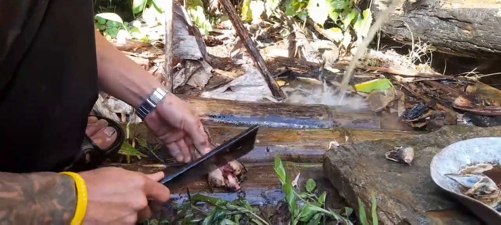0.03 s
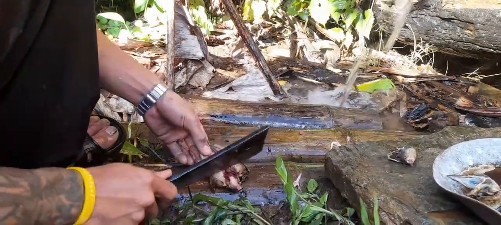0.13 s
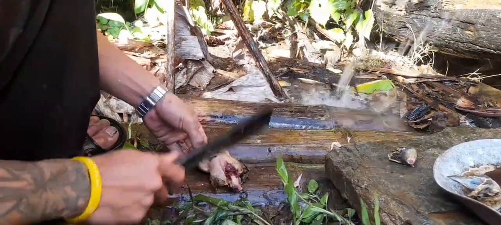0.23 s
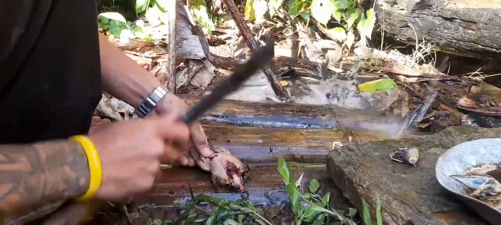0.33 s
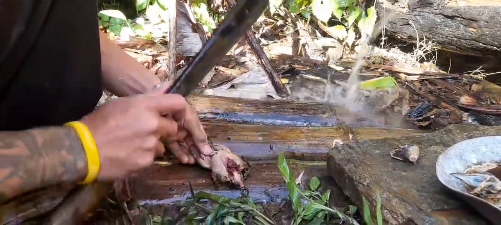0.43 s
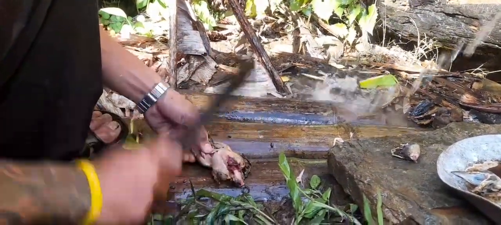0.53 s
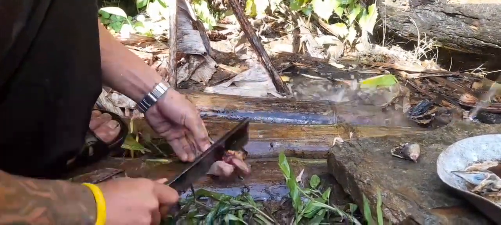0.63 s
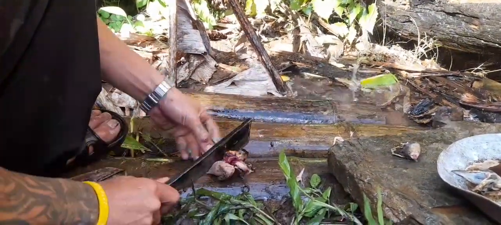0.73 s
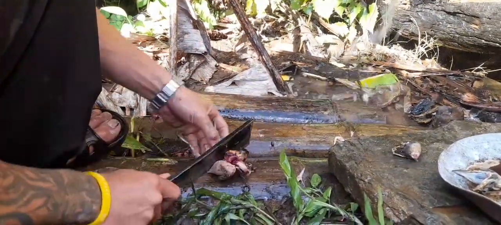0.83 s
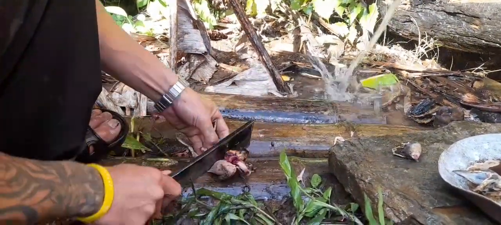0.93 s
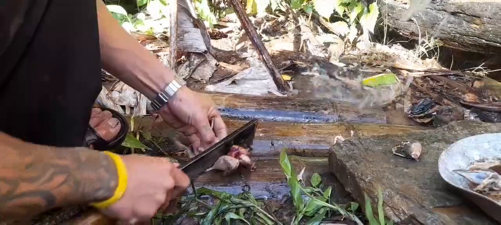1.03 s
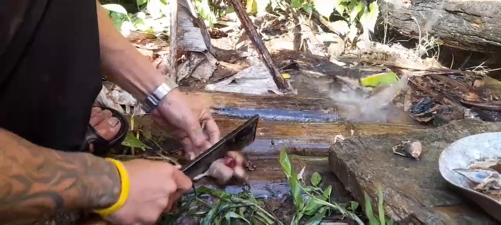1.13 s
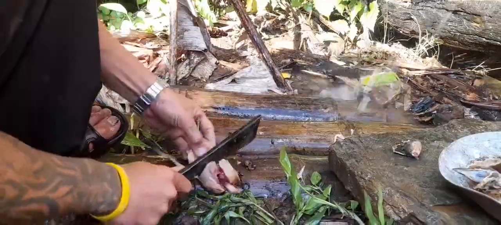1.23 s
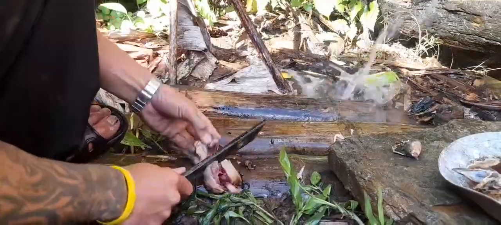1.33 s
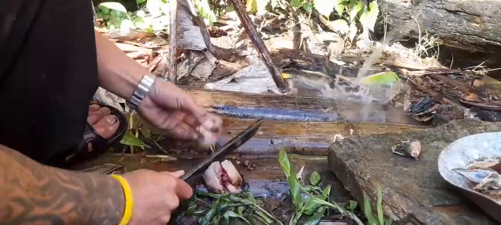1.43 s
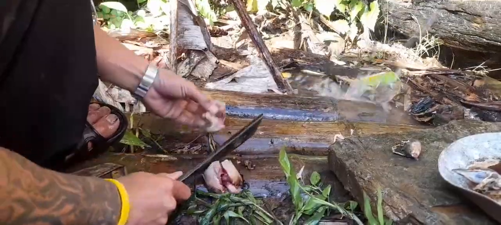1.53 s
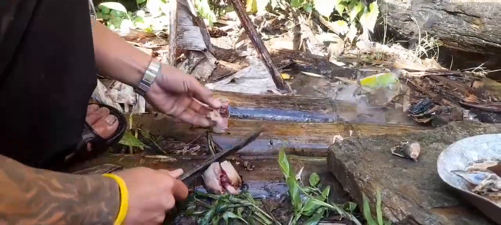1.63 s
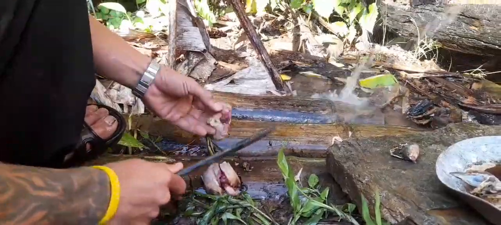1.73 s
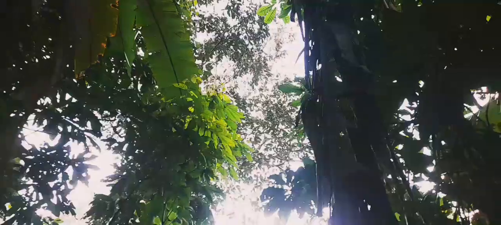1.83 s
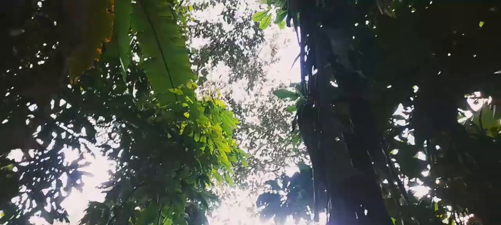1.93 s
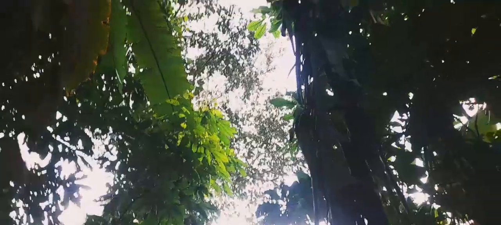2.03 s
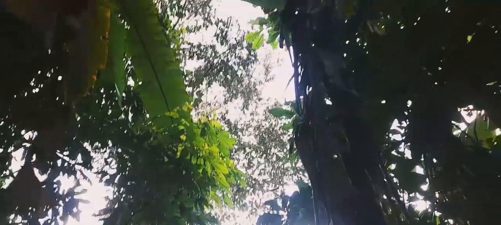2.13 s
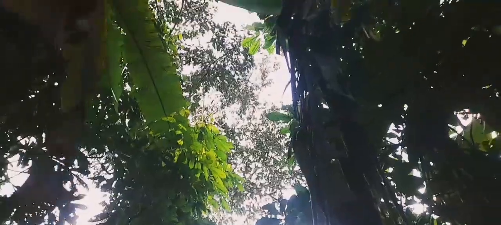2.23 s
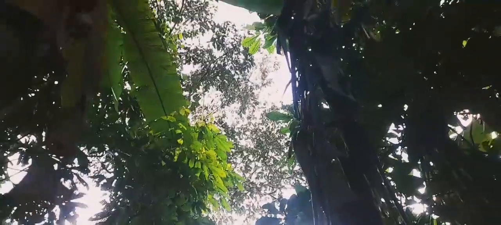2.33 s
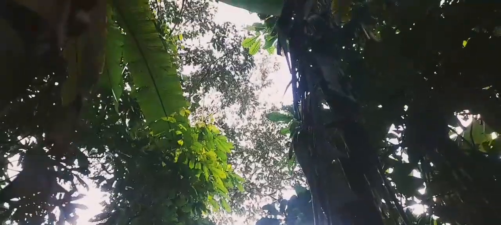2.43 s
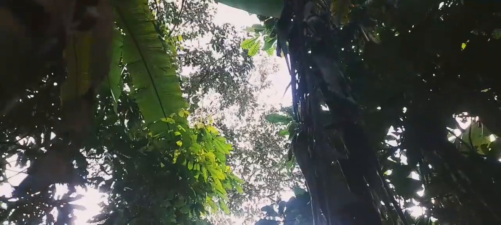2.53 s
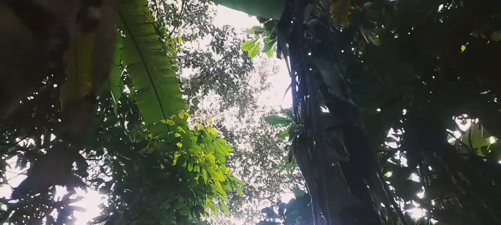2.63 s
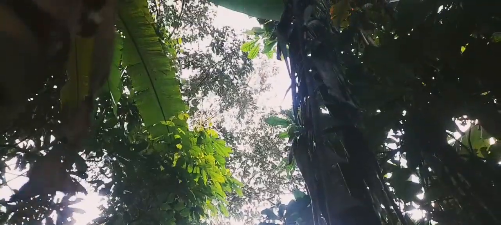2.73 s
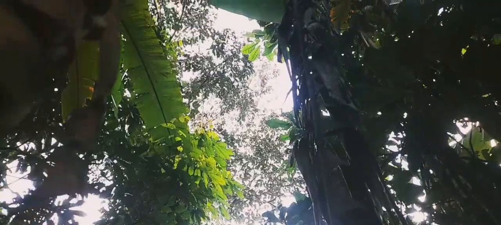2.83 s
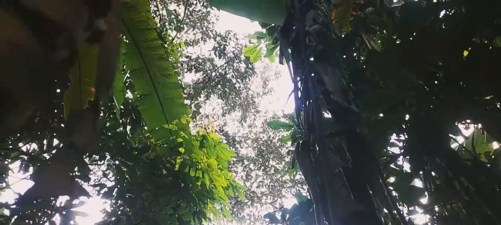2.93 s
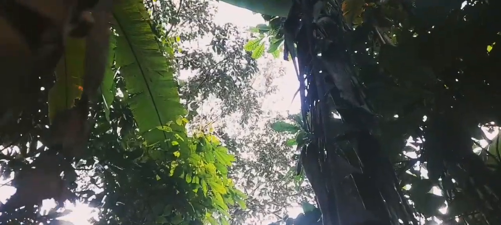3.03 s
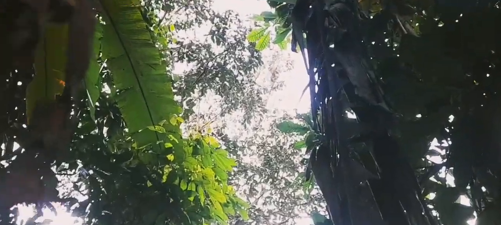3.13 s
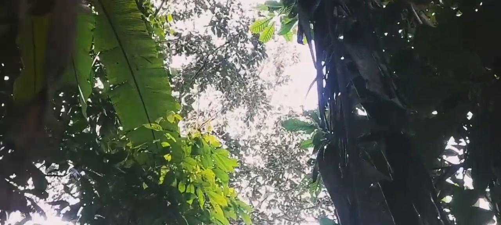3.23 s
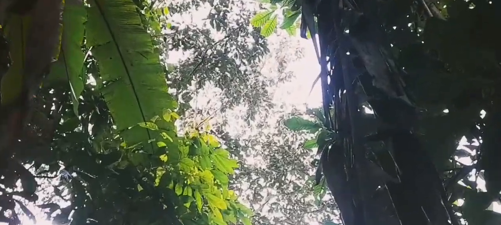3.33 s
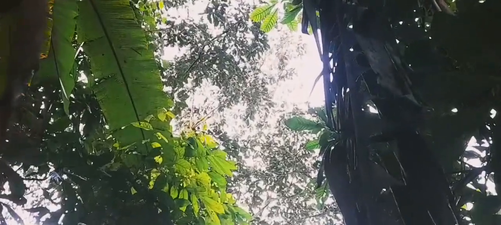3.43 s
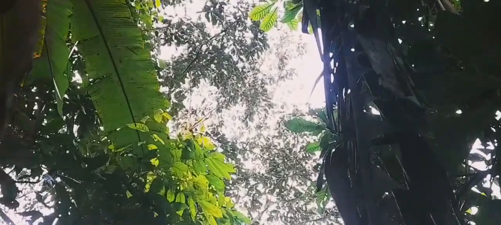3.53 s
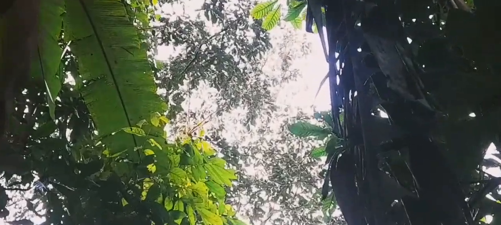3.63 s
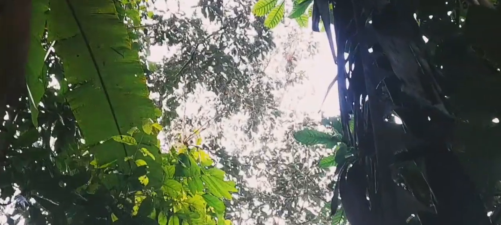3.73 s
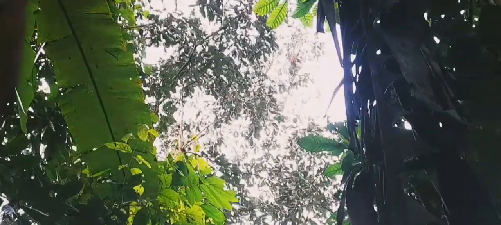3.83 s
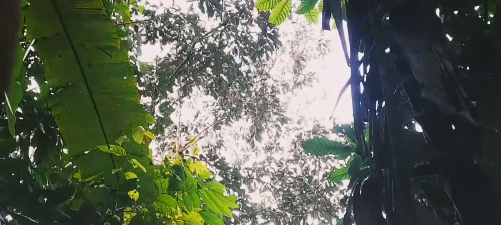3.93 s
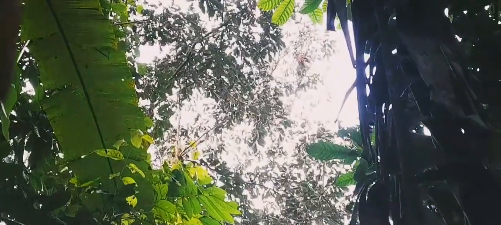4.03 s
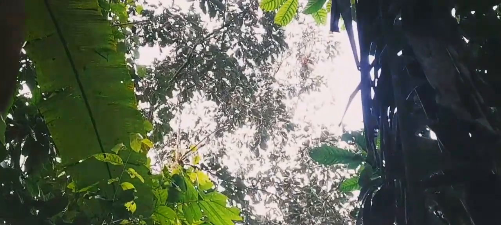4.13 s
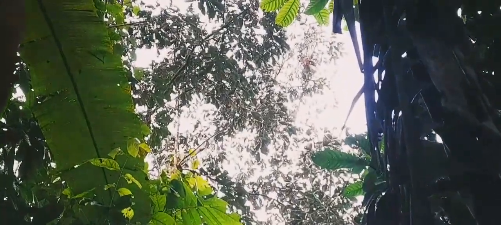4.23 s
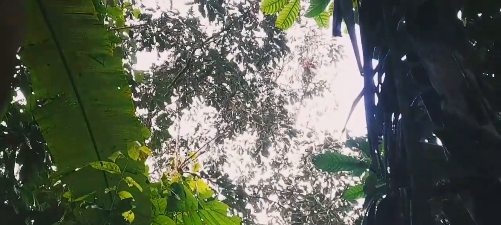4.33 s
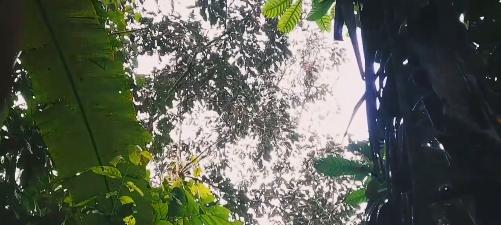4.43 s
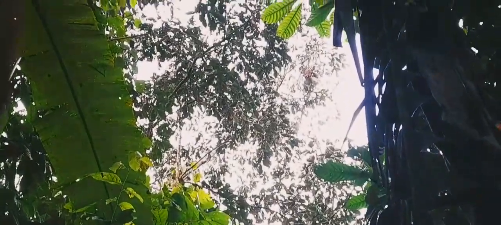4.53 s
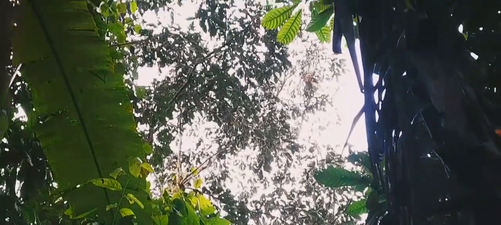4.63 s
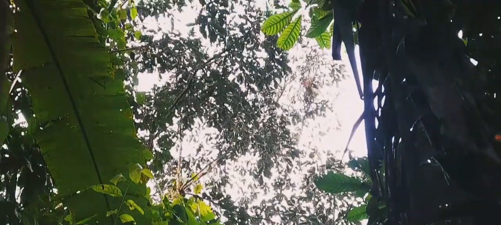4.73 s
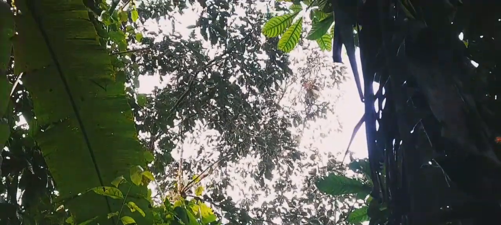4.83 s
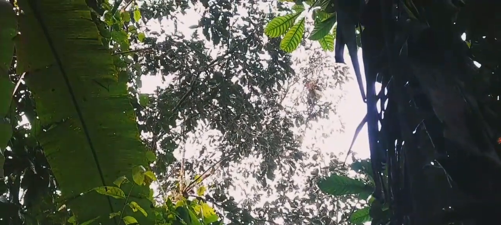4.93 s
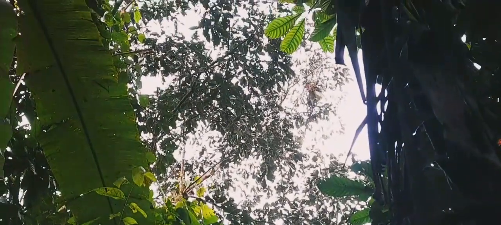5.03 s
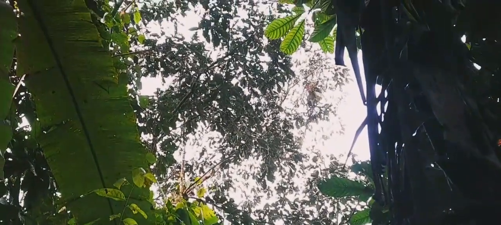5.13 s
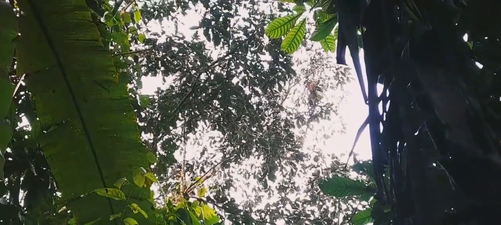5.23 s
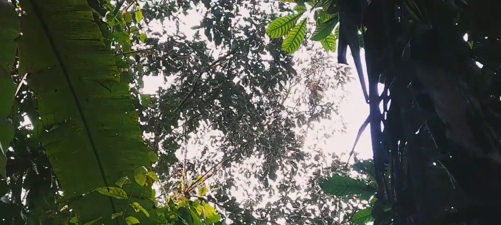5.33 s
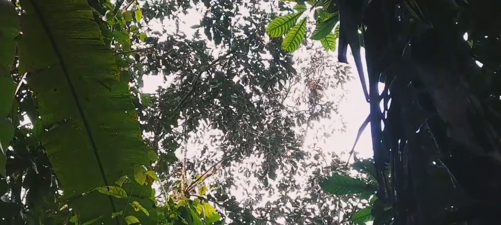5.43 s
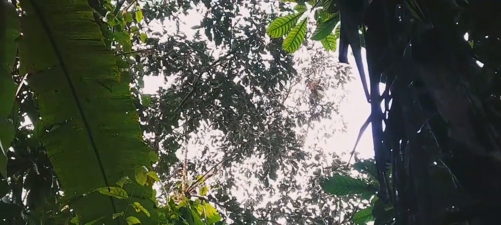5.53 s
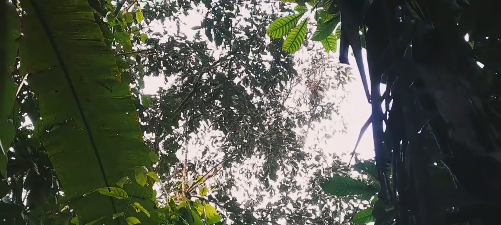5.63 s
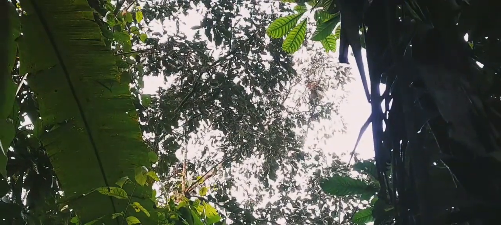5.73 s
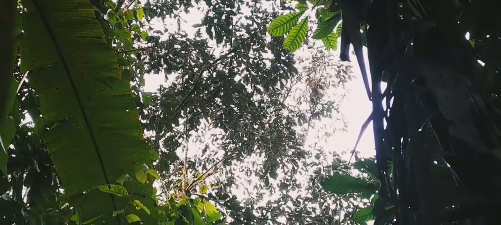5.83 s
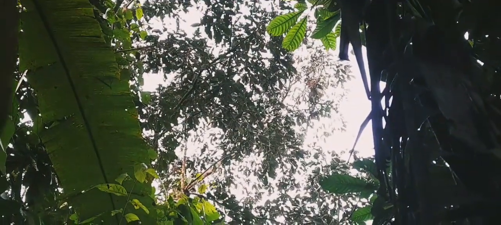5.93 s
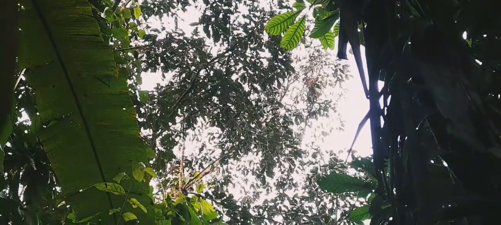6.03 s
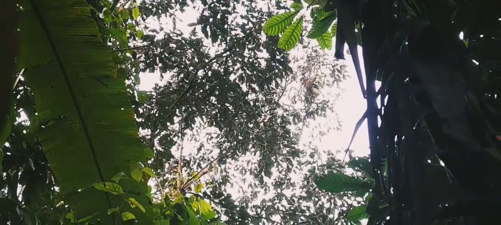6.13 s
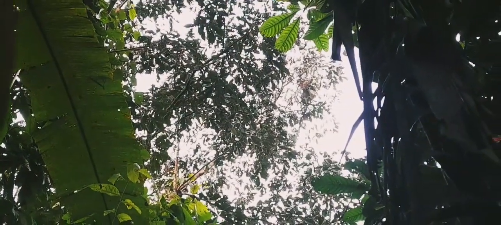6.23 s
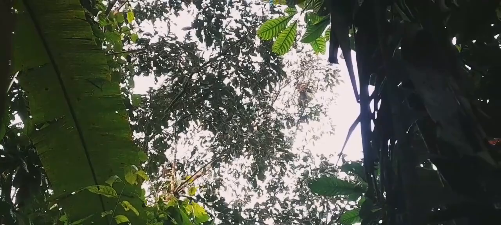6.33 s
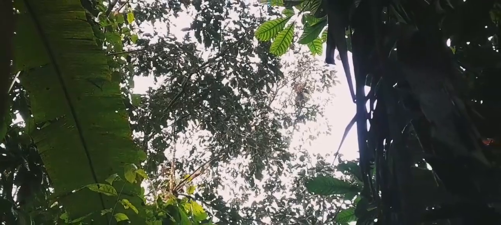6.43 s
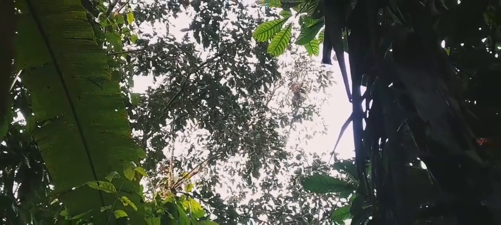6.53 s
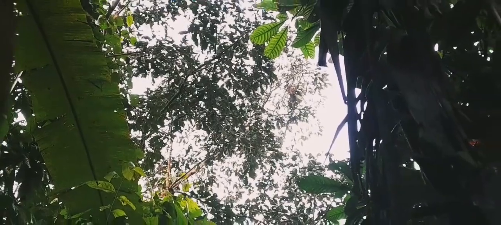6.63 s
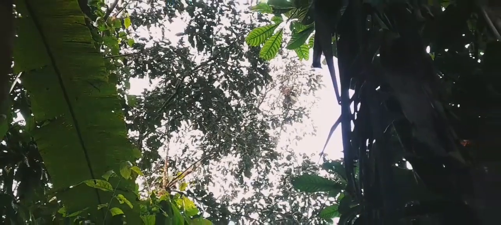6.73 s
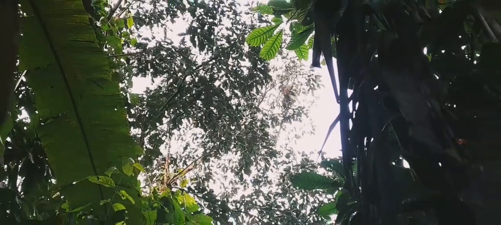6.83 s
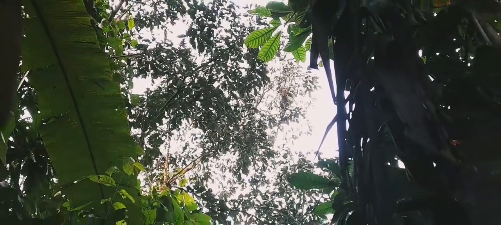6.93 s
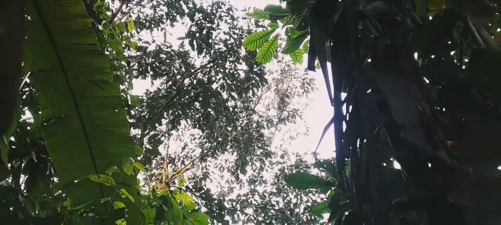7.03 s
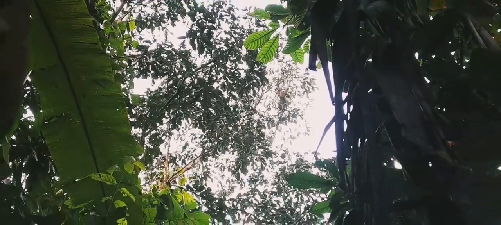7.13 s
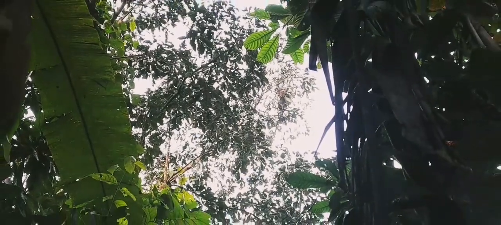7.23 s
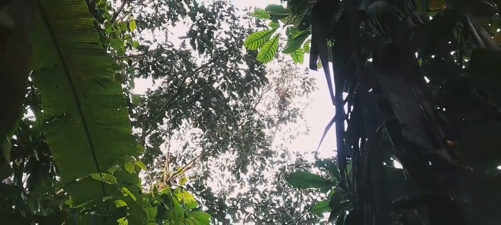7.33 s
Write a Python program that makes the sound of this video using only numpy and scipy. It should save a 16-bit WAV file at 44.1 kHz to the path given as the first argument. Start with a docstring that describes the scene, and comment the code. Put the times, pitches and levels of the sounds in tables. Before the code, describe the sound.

Very close, crisp water spurts in uneven splashes onto a wet log, with bubbles and bright slaps. One sharp woody chop cracks through, followed by tiny taps. After a split-second silence comes a much quieter forest: gliding bird whistles, short nasal honks and one screech, washed in long diffuse echo, with soft knocks and thin rustles over faint air.

```python
"""At a wet log, close to the microphone and to its right: water spurts from a spout onto the wood
while a large knife chops once. Water is clumped noise with bubble tones; the log is a set of ringing modes.
After a brief silence, a quiet forest: birds whistle, honk and screech as gliding tones and harmonics, and
one thin, steady insect tone sounds near 5.8 kHz; the trunks return all of these as a long diffuse echo.
Twigs and drops knock softly, thin rustles swell; the same forest air, steady noise, lies faintly under the water."""
import sys
import numpy as np
from scipy import signal
from scipy.io import wavfile
from scipy.ndimage import uniform_filter1d

SR = 44100
rng = np.random.default_rng(int(sys.argv[2]) if len(sys.argv) > 2 else 0)


def to_wav(sig):
    """Store sig (one row per channel, or 1-D mono) as 16-bit WAV at the path in sys.argv[1].

    Samples outside -1..1 are clipped; the rate is SR.
    """
    pcm = np.clip(np.atleast_2d(sig), -1, 1) * 32767
    pcm = np.round(pcm).astype(np.int16)
    wavfile.write(sys.argv[1], SR, pcm.T)  # frames by channels


N = 325017
T = np.arange(N) / SR   # time of every sample, s

# spurts from the spout: top_s, rise_s, hold_s, spray_db, gurgle_re_spray_db
SPURTS = [(0.0, .003, 0.018, -34, 3), (0.036, 0.026, 0.071, -40, 10.5), (0.137, 0.092, 0.0058, -33, -0.5),
          (0.174, 0.054, 0.046, -38.5, 4.5), (0.254, 0.043, 0.01, -31, -1),
          (0.334, 0.079, 0.0045, -33, 1.5), (0.366, 0.024, 0.011, -38.5, 12),
          (0.398, 0.0047, 0.01, -39, -11), (0.462, 0.026, 0.012, -39, -2), (0.507, 0.0032, 0.061, -36, -10),
          (0.573, 0.016, 0.072, -38.5, 4), (0.667, 0.014, 0.023, -48.5, 11.5),
          (0.74, 0.022, 0.093, -56, -31), (0.94, 0.0017, 0.01, -46.5, -3), (0.972, 0.024, 0.11, -40, -10),
          (1.041, 0.0094, 0.12, -44.5, 9), (1.096, 0.014, 0.033, -40, 1), (1.192, 0.0022, 0.012, -40, -3),
          (1.241, 0.032, 0.016, -46, -1), (1.315, 0.0019, 0.056, -42.5, -3),
          (1.425, 0.0014, 0.083, -42.5, -13), (1.466, 0.038, 0.035, -39.5, -1.5),
          (1.535, 0.0072, 0.046, -39.5, -1.5), (1.63, 0.005, 0.011, -34.5, -6),
          (1.746, 0.16, 0.0024, -41, 2)]
# slugs of water slapping the wood: start_s, treble_peak_db, body_re_treble_db
SLAPS = [(0.136, -14, -2), (0.2546, -9.5, -3.5), (0.3163, -16, -22.5), (0.339, -15, -22.5),
         (0.3717, -12, -13), (0.5081, -12, -15.5), (0.5385, -17, -9), (0.613, -15, -13.5),
         (0.637, -13.5, -7.5), (0.7414, -25, -32), (0.941, -20.5, -10.5), (0.98, -19.5, -32),
         (1.1958, -15.5, -21), (1.3117, -14, -15), (1.347, -15.5, -19), (1.5232, -30, -22),
         (1.6295, -15.5, -9)]
# tone balance of the water: pitch_hz, relative_density_db (per Hz)
WATER_SPECTRUM = [(35, -59), (60, -30.5), (140, -10), (497, -3.5), (961, -10), (1270, -0.5), (1900, -5),
                  (2090, -9.5), (4120, 0), (5870, -9), (10300, -2), (15000, -6), (16500, -32)]
# stereo width of the water: pitch_hz, left_right_likeness (0-1)
WATER_ALIKE = [(60, 0.67), (240, 0.89), (950, 0.74), (3770, 0.17), (15000, 0.4)]
# balance of the water: pitch_hz, left_over_right_db
WATER_PAN = [(60, -5), (500, 0.5), (3770, -1.5), (15000, -5.0)]
# single bubbles: start_s, start_hz, end_over_start_pitch (factor), length_s, level_db
BUBBLES = [(0.154, 1300, 1.2, 0.0073, -33.5), (.431, 850, 0.93, .012, -40), (0.922, 296, 1.8, 0.0214, -64),
           (0.82, 398, 2.1, 0.02, -60), (0.955, 3360, 1.07, 0.0058, -35.5), (0.968, 1300, 6, 0.017, -42.5),
           (1.189, 612, 3, 0.015, -50), (1.229, 349, 2.6, 0.031, -55), (1.322, 1300, 1.3, 0.0066, -40),
           (1.541, 1400, 1.16, 0.0095, -39), (1.643, 1350, 1.5, 0.0057, -32),
           (1.728, 1400, 1, 0.0076, -40.5)]
# ringing modes of the log: pitch_hz, relative_level_db, t60_s
LOG_MODES = [(166, -13, 0.045), (240, -14, 0.04), (300, -17.5, 0.036), (373.5, -16, 0.038),
             (464, -17.5, .05), (554, -14.5, 0.05), (680, -14, 0.041), (785, -11.5, 0.029),
             (1618, -14.5, .025), (3840, -4, .015), (4450, 2, .008), (5477, -1.5, 0.018)]
# blows on the log: start_s, relative_level_db, contact_hz
BLOWS = [(0.647, 5, 680), (0.678, -14.5, 583), (1.62, -22, 198), (1.658, -23.5, 200), (1.688, -23.5, 196)]
# whistled bird notes and one steady insect tone (5790 Hz):
# start_s, length_s, start_hz, middle_hz, end_hz, level_db, start_to_end_swell_db
WHISTLES = [ (1.815, 0.044, 3160, 3060, 3060, -60, -23), (1.848, 0.068, 2464, 2306, 2080, -63.5, 0),
            (1.938, 0.029, 3000, 3000, 2870, -62, 0), (1.981, 0.035, 2754, 2790, 2760, -63, -4),
            (2.415, 0.023, 2426, 2623, 2520, -49.5, 4), (2.616, 0.066, 2960, 3170, 3190, -47.5, 17),
            (2.651, 0.05, 3285, 3280, 3238, -43.5, -9), (2.702, 0.032, 3190, 2600, 2170, -45, -9),
            (2.85, 0.029, 4230, 4190, 3050, -50, 26), (2.901, 0.066, 2535, 3190, 3550, -41, 10.5),
            (2.965, 0.074, 3540, 4460, 4650, -46, -18), (4.622, 0.062, 4590, 4380, 4010, -59.5, 1),
            (4.681, 0.13, 2950, 3135, 3070, -59.5, -4), (4.77, 0.071, 2506, 2680, 2760, -57, -7),
            (4.85, 0.066, 2290, 2416, 2516, -59, 0), (4.915, 0.1, 3750, 4080, 3950, -66.5, 4),
            (4.914, 0.028, 3115, 3090, 3330, -55.5, 9), (4.979, 0.023, 3120, 2940, 2730, -50, -3),
            (5.021, 0.013, 2540, 2515, 2500, -51.5, -20), (5.037, 0.048, 3530, 3890, 4170, -58.5, -9),
            (5.235, 0.12, 2361, 2312, 2410, -50.5, 5), (5.253, 0.057, 2710, 2776, 3010, -44.5, -2),
            (5.328, 0.042, 2983, 2750, 2205, -44, 3), (5.375, 0.025, 3010, 2924, 2970, -47, -6),
            (5.486, 0.038, 4070, 3930, 3220, -45, 13), (5.5, 0.055, 2307, 2820, 2900, -44, 3),
            (5.53, 0.058, 2410, 3060, 3137, -39, 8), (5.605, 0.047, 3216, 3900, 4430, -37, 3.5),
            (5.57, 0.037, 2380, 2260, 1650, -52, 4), (5.685, 0.057, 2606, 2385, 2226, -49.5, -11.5),
            (6.079, 0.057, 1803, 1914, 2020, -55.5, -9), (6.129, 0.071, 3167, 3015, 3010, -53, -8),
            (6.235, 0.089, 2516, 2337, 2270, -51, -9), (6.221, 0.023, 2713, 2730, 2560, -48.5, -7),
            (6.334, .03, 2250, 2224, 2000, -51, 14), (6.282, 0.021, 1860, 1725, 1560, -54, -19),
            (6.348, 0.048, 4150, 3384, 2830, -50.5, 9), (6.372, 0.051, 2264, 3310, 4450, -50.5, -16),
            (6.64, 0.23, 5790, 5810, 5740, -74.5, -3), (6.695, 0.045, 2720, 2000, 1856, -60.5, -12),
            (6.769, 0.053, 3154, 3034, 2754, -47.5, 7), (6.962, 0.02, 2020, 2330, 2560, -58, -18),
            (7, 0.023, 3200, 2990, 2410, -46.5, 5), (7.064, 0.06, 3850, 3170, 3275, -48, -4),
            (7.083, 0.053, 1570, 1920, 2180, -62.5, 0), (7.26, 0.042, 2026, 2370, 2634, -56, 17),
            (7.302, 0.013, 2460, 4770, 5250, -40, 4), (7.31, 0.029, 5140, 3930, 3640, -32.5, 18),
            (7.328, 0.033, 3630, 3350, 3180, -34.5, -8)]
# nasal honks: start_s, end_s, start_hz, held_hz, brightest_hz, bright_width_hz, level_db, hoarse_start (0-1)
HONKS = [(2.339, 2.414, 476.4, 505, 2990, 927, -59.5, 0.37),
         (2.807, 2.902, 371, 477, 1860, 701, -67.5, 0.1), (3.148, 3.26, 382, 463, 2240, 652, -62, 0.12),
         (3.497, 3.593, 391, 483, 2350, 800, -62, 0.12), (3.873, 3.982, 383.7, 468, 2350, 700, -63, .1),
         (4.107, 4.171, 392, 464, 2270, 400, -66, .1), (4.19, 4.245, 500.4, 528, 2660, 676, -45, 0.24),
         (6.006, 6.085, 474.3, 532.5, 2744, 664, -45, 0.31),
         (6.882, 6.986, 488, 537.5, 3160, 1320, -55, 0.7)]
# course of one screech: time_s, pitch_hz, tone_db, rasp_db, pitch_jitter (share)
SCREECH = [(4.269, 1333, -63, -73, 0.043), (4.289, 1450, -56.5, -67.5, 0.089),
           (4.315, 1433, -53, -59, 0.072), (4.332, 1505, -45, -61, 0.011),
           (4.349, 1538, -55.5, -56, 0.0035), (4.402, 1532, -72, -88, 0.0034),
           (4.45, 1494, -79, -94, 0.0035)]
# harmonics of the screech: multiple_of_pitch (count), relative_level_db
SCREECH_HARMONICS = [(2, -2), (3, -13), (4, 2.5), (5, -7), (6, -16)]
# soft knocks of twigs and drops: start_s, level_db, pitch_hz
KNOCKS = [(1.91, -42, 728), (2.028, -54, 795), (3.273, -51, 1110), (3.576, -49, 900), (3.837, -50, 762),
          (4.95, -46, 750), (5.086, -50.5, 810), (5.172, -48.5, 1310), (7.033, -44, 630)]
# thin high rustles: start_s, end_s, low_hz, high_hz, level_db
RUSTLES = [(1.812, 2.016, 3460, 16500, -64), (2.694, 3.126, 2270, 6830, -65),
           (5.504, 5.75, 1800, 9800, -63), (6.079, 6.49, 11150, 13800, -67.5),
           (6.255, 6.41, 6000, 7700, -66), (7.289, 7.384, 4490, 12700, -51),
           (6.897, 7.025, 4300, 15000, -73)]
# tone balance of the forest air: pitch_hz, relative_density_db (per Hz)
FOREST_SPECTRUM = [(15, -46), (25, -12.5), (138, -7.5), (220, -7.5), (399, -13.5), (766, -3.5), (1510, -7),
                   (2530, -7), (3150, -2.5), (5720, -13.5), (9580, -19), (10700, -24.5), (14000, -23.5),
                   (16500, -42.5)]
# stereo width of the forest air: pitch_hz, left_right_likeness (below 0 is treated as 0)
FOREST_ALIKE = [(60, 0.48), (240, 0.82), (950, -0.82), (3770, -0.04), (15000, -0.068)]
# balance of the forest air: pitch_hz, left_over_right_db
FOREST_PAN = [(60, -2.5), (950, -3), (15000, -14)]
# course of the far birds: time_s, relative_level_db
CHATTER = [(1.8, -60), (2.3, -89), (2.8, -48), (3.4, -67), (4.0, -63.5), (4.5, -68.5), (5.0, -59),
           (5.5, -67), (6.0, -53), (6.4, -52.5), (6.6, -73), (7.0, -66), (7.37, -52.5)]
# deep bumps, the ground under the blow and the forest opening: start_s, level_db, pitch_hz, decay_s
THUMPS = [(0.653, -37.5, 52.53, .04), (1.819, -51.5, 59, 0.027)]
# silence between the two places: start_s, end_s
SILENCE_S = (1.772, 1.819)

RISE_DB = 18                              # climb of a spurt during its rise
SAG_DB_PER_S, FALL_DB_PER_S = 49.5, 381   # loss from the top on, further loss after the hold
TRICKLE_DB, TRICKLE_GURGLE_DB = -68, -6   # drips between spurts: spray, gurgle re spray
CROWD_DB = -12.5                          # small bubbles re gurgle
SPITS_PER_S, SPIT_DB = 220, 5.5           # lone drops: typical rate, level re spray
SLAP_SNAP_S, SLAP_SPLASH_S = .001, .005   # decay times
GROUND_ECHO_S = .012                      # delay before the surroundings answer the blow
NOTE_EDGE_S, NOTE_ARCH_DB = .004, -2      # whistles: fade time, middle of a note re its ends
NEAR_DB = -42                             # whistles quieter than this are farther away
DIRECT_LOSS = .3                          # dB of direct sound lost per dB of farness
GLIDE_WARBLE = .0025                      # pitch share per dB of farness, times the width of the glide
HONK_WAVER, HONK_RASP_S = .005, .052      # pitch share, time scale of a hoarse start
FOREST_DB = -62                           # rms of the forest air
LOW_CUT_HZ, CUTOFF_HZ = 42, 16500         # microphone bass cut, top cut


def from_db(db):
    """Amplitude gain of a level in dB."""
    return 10 ** (np.asarray(db) / 20)


def rms_one(x):
    """Scale to an rms of 1."""
    return x / np.sqrt(np.mean(x ** 2) + 1e-20)


def in_time(rows):
    """Draw straight lines through the columns of a table whose first column is time."""
    s, *columns = np.transpose(rows)
    return [np.interp(T, s, column) for column in columns]


def at_hz(points, hz):
    """Read a frequency table along a logarithmic axis."""
    known_hz, values = np.transpose(points)
    return np.interp(np.log(hz), np.log(known_hz + 1), values)


def fade(t, start, end, edge):
    """1 between start and end, with ramps of edge seconds."""
    return np.clip(np.minimum(t - start, end - t) / edge, 0, 1)


def panned(x, pan_db):
    """Set left over right by pan_db, half on each channel."""
    return x * from_db(np.array([[.5], [-.5]]) * pan_db)


def drift(rate, size):
    """Smooth noise of spread 1, from two equal low-pass poles at rate Hz."""
    r = np.exp(-2 * np.pi * rate / SR)
    noise = signal.lfilter([1], [1, -2 * r, r * r], rng.standard_normal(size + 9000))
    return rms_one(noise[9000:])   # the filter has settled


def band(x, low_hz, high_hz):
    """Keep one frequency band."""
    return signal.sosfilt(signal.butter(2, [low_hz, min(high_hz, .45 * SR)], "band", fs=SR, output="sos"), x)


def banded(white, spectrum, alike, pan, patchy_db, rate, count=2, colour=None):
    """Stereo noise bands, count to the octave, each with its own level, flicker, likeness and balance."""
    out, size = 0, white.shape[-1]
    edges = 25 * 2 ** np.arange(0, 9.6, 1 / count)
    for k, (low, high) in enumerate(zip(edges, edges[1:])):
        mid, side = band(white[k % 2], low, high)
        hz = np.sqrt(low * high)
        likeness = np.clip(at_hz(alike, hz), 0, 1)
        level_db = at_hz(spectrum, hz) + patchy_db * drift(rate, size) + (colour(hz) if colour else 0)
        stereo = np.sqrt(1 + likeness) * mid + np.sqrt(1 - likeness) * side * [[1], [-1]]
        out = out + from_db(level_db) * panned(stereo, at_hz(pan, hz))
    return out


def flow(size):
    """Each spurt rises, holds and falls; spurts add in power. Returns spray dB and gurgle re spray dB."""
    top, rise, hold, db, gurgle_db = np.transpose(SPURTS)[:, :, None]
    t = T[:size] - top
    level = db - RISE_DB * np.clip(-t, 0, 9) / rise
    level = level - SAG_DB_PER_S * np.clip(t, 0, 9) - FALL_DB_PER_S * np.clip(t - hold, 0, 9)
    # doubled dB make powers
    spray = np.sum(from_db(2 * level), axis=0) + from_db(2 * TRICKLE_DB)
    gurgle = np.sum(from_db(2 * (level + gurgle_db)), axis=0) + from_db(2 * (TRICKLE_DB + TRICKLE_GURGLE_DB))
    return 10 * np.log10(spray), 10 * np.log10(gurgle / spray)


def gurgles(level_db):
    """A crowd of small bubbles born at random, each a short rising tone."""
    out = np.zeros(len(level_db) + 2000)
    for at, pitch, cycles, size in rng.random((260, 4)):
        hz = 450 * 5.5 ** pitch
        u = np.linspace(0, 1, int((4 + 10.0 * cycles) * SR / hz))
        i = int(at * len(level_db))
        tone = np.sin(2 * np.pi * np.cumsum(hz * 1.4 ** u) / SR) * np.sin(np.pi * u ** 0.27)
        out[i:i + len(u)] += from_db(level_db[i] + 10 * size) * tone
    return out[:len(level_db)]


def spits(level_db):
    """Lone drops burst at random, each ringing briefly in one of twelve bands, at its own place."""
    size = len(level_db)
    born = rng.random(size) < SPITS_PER_S * from_db(5 * drift(12, size)) / SR
    strength_db = level_db + 5 * np.minimum(rng.exponential(1, size), 2)
    place_db = rng.normal(0, 4, (2, size))
    clicks = born * from_db(strength_db) * from_db(place_db)
    dealt = rng.integers(0, 12, size)   # which band each drop rings
    return sum(band(clicks * (dealt == k) + 1e-18, hz / 1.5, hz * 1.1) * np.sqrt(SR / hz)
               for k, hz in enumerate(np.geomspace(1300, 12000, 12)))


def water():
    """Dense droplet grains in clumps; spray and gurgle swell with each spurt."""
    size = int(1.8 * SR)
    spray, gurgle = flow(size)
    grains = from_db(3.44 * np.minimum(rng.exponential(1, size), 4) + 2.08 * drift(140, size))
    white = rng.standard_normal((2, 2, size)) * grains

    def colour(hz):
        """The lower the band, the more it follows the gurgle."""
        return spray + np.clip(np.log2(7000 / hz) / 3.6, 0, 1) * gurgle

    wet = from_db(1.5) * banded(white, WATER_SPECTRUM, WATER_ALIKE, WATER_PAN,
                                patchy_db=3.6, rate=22, count=3, colour=colour)
    wet += panned(gurgles(spray + gurgle + CROWD_DB), -2.5)
    wet += panned(spits(spray + SPIT_DB), -2.5)
    return np.pad(wet, ((0, 0), (0, N - size)))


def forest_air():
    """The quiet bed of the forest: steady noise in bands that flicker slowly."""
    white = rng.standard_normal((2, 2, N))
    air = banded(white, FOREST_SPECTRUM, FOREST_ALIKE, FOREST_PAN, patchy_db=2.3, rate=3.1)
    return from_db(FOREST_DB) * rms_one(air)


def slaps():
    """Each slug of water is a short bright burst of noise with a duller body."""
    out, t = np.zeros((2, N)), np.arange(900) / SR
    envelope = np.exp(-t / SLAP_SNAP_S) + 0.45 * np.exp(-t / SLAP_SPLASH_S)
    for (s, db, body_db), white in zip(SLAPS, rng.standard_normal((len(SLAPS), 2, 900))):
        burst = (white + 0.25 * white[::-1]) * envelope   # the channels share a little
        treble = band(burst, 7000, 14000)
        body = from_db(body_db) * band(burst, 700, 7200)
        shot = (treble + body) / np.abs(treble).max()
        i = round(s * SR)
        out[:, i:i + 900] += panned(from_db(db) * shot, -2.5)
    return out


def bubbles():
    """A bubble is a brief sine, mostly rising in pitch as it nears the surface."""
    out = np.zeros(N)
    for s, hz, rise, length, db in BUBBLES:
        u = np.arange(round(length * SR)) / (length * SR)
        tone = np.sin(2 * np.pi * np.cumsum(hz * rise ** u) / SR) * np.sin(np.pi * np.sqrt(u))
        i = round(s * SR)
        out[i:i + len(u)] += 2 * from_db(db) * tone
    return out


def log():
    """Every blow rings the modes of the log; the wood first yields, then springs back."""
    push = np.full(2 * SR + 9000, 1e-18)
    for s, db, contact_hz in BLOWS:
        k = np.arange(900) * 2 * np.pi * contact_hz / SR
        i = round(s * SR)
        push[i:i + 900] += from_db(db) * k * (k - 1.4) * np.exp(-k) * k[1]
    out = 0
    for hz, db, t60 in LOG_MODES:
        r, w = from_db(-60 / (t60 * SR)), 2 * np.pi * hz / SR
        out = out + signal.lfilter([0, from_db(db) * np.sin(w)], [1, -2 * r * np.cos(w), r * r], push)
    # a log radiates little deep bass
    out = signal.sosfilt(signal.butter(4, 120, "high", fs=SR, output="sos"), out)
    return np.pad(out, (0, N - len(push)))


def crack():
    """The blade edge bites: a few milliseconds of bright noise."""
    t = np.clip(T - BLOWS[0][0] + .0024, 0, 1)
    burst = rng.standard_normal(N) * (t / .002) * np.exp(-t / .002)
    return from_db(1.5) * band(burst, 2800, 6000)


def thump():
    """Deep bumps: a dying low sine each."""
    out = 0
    for s, db, hz, decay in THUMPS:
        t = np.clip(T - s, 0, 1)
        out = out + from_db(db) * np.sin(2 * np.pi * hz * t) * np.exp(-t / decay)
    return out


def scattered_echo(x, t60_s):
    """Scattering, as off trunks: a dying noise response, its own in each ear, building up over a few ms."""
    t = np.arange(int(1.5 * SR)) / SR
    envelope = (from_db(-60 * t / t60_s) + 5.7 * np.exp(-t / 0.057)) * (1 - np.exp(-t / .006))
    tail = rng.standard_normal((2, len(t))) * envelope
    tail /= np.sqrt(np.sum(tail ** 2, axis=1, keepdims=True))
    return signal.fftconvolve(x[None], tail, axes=1)[:, :N]


def rustles():
    """Swells of flickering noise, each in its own high band."""
    out = np.zeros((2, N))
    for start, end, low_hz, high_hz, db in RUSTLES:
        here = slice(round(start * SR), min(round(end * SR), N))
        t = T[here]
        noise = band(rng.standard_normal((2, N // 10)), low_hz, high_hz) * from_db(2.9 * drift(45, N // 10))
        swell = np.sin(np.pi * np.abs((t - start) / (end - start)) ** 0.74)
        out[:, here] += from_db(db) * swell * rms_one(noise)[:, :len(t)]
    return out


def whistles():
    """Near sines with a faint octave: gliding bird notes, one insect tone. Rows: as sung, direct part."""
    out, warble = np.zeros((2, N)), drift(170, N)
    for s, length, start_hz, middle_hz, end_hz, db, swell_db in WHISTLES:
        here = slice(round(s * SR), min(round((s + length) * SR), N))
        u = (T[here] - s) / length
        far_db = np.clip(NEAR_DB - db, 0, 15)
        hz = uniform_filter1d(np.interp(u, [0, .5, 1], [start_hz, middle_hz, end_hz]), size=150)
        warble_share = 0.0014 + GLIDE_WARBLE * far_db * abs(np.log(end_hz / start_hz))
        phase = 2 * np.pi * np.cumsum(hz * (1 + warble_share * warble[here])) / SR
        level = from_db(db + swell_db * (u - .5) + NOTE_ARCH_DB * np.sin(np.pi * u))
        level = level * fade(T[here], s, s + length, NOTE_EDGE_S)
        note = level * (np.sin(phase) + from_db(-42) * np.sin(2 * phase))
        out[:, here] += note * from_db([[0], [-DIRECT_LOSS * far_db]])
    return out


def chatter():
    """Many far birds: short random glides, meant to be heard only as echo."""
    out, u = np.zeros(N + 4000), np.linspace(0, 1, 3000)
    opens = SILENCE_S[1] * SR
    for at, pitch, glide, size in rng.random((300, 4)):
        i = int(opens + at * (N - opens))
        hz = 2000 * 1.8 ** pitch * 1.4 ** ((glide - .5) * u)
        tone = np.sin(2 * np.pi * np.cumsum(hz) / SR) * np.sin(np.pi * u)
        out[i:i + 3000] += from_db(2.5 * size) * tone
    return from_db(in_time(CHATTER)[0] - 11.0) * out[:N]


def knocks():
    """Dull taps of twigs and drops: a quickly dying puff of noise around a pitch."""
    out, t = np.zeros(N), np.arange(1500) / SR
    for (s, db, hz), white in zip(KNOCKS, rng.standard_normal((len(KNOCKS), 1500))):
        i = round(s * SR)
        out[i:i + 1500] += from_db(db) * band(white * np.exp(-t / 0.014), hz / 2.1, hz * 1.52)
    return out


def honks():
    """Harmonics sliding up to a held pitch, shaped by one broad throat resonance."""
    out, waver, hoarse = np.zeros(N), 1 + HONK_WAVER * drift(40, N), drift(470, N)
    for start, end, start_hz, held_hz, bright_hz, width_hz, db, rough in HONKS:
        here = slice(round(start * SR), round(end * SR))
        t = T[here]
        hz = held_hz + (start_hz - held_hz) * np.exp(-(t - start) / .023)
        phase = 2 * np.pi * np.cumsum(hz * waver[here]) / SR
        stack = sum(np.sin(k * phase) / (1 + ((k * held_hz - bright_hz) / width_hz) ** 2) ** 2
                    for k in range(2, 11))
        rasp = rough * np.exp(-((t - start) / HONK_RASP_S) ** 2)
        stack *= 1 - .8 * rasp + (.05 + rasp) * hoarse[here]
        out[here] += from_db(db) * fade(t, start, end, 0.023) * stack
    return out


def screech():
    """Jittery harmonics plus a broad rasp."""
    hz, tone_db, rasp_db, jitter = in_time(SCREECH)
    phase = 2 * np.pi * np.cumsum(hz * (1 + jitter * drift(282, N))) / SR
    tone = sum(from_db(db) * np.sin(int(k) * phase) for k, db in SCREECH_HARMONICS)
    rasp = rms_one(band(rng.standard_normal(N), 2800, 12000))
    sound = from_db(tone_db) * tone + from_db(rasp_db) * rasp
    return fade(T, SCREECH[0][0], SCREECH[-1][0], 0.0025) * sound


def animal_calls():
    """Bird calls and the insect tone, direct sound to the right, with their long echo and the far birds'."""
    flutter = from_db(.8 * drift(60, N))   # slight random flutter in the level of every call
    voices, direct = (whistles() + honks() + screech()) * flutter
    late = np.roll(direct, 10)   # louder on the right, but arriving there a little later
    near = panned(from_db(-1.0) * np.array([direct, late]), -16.0)
    return near + panned(from_db(5.0) * scattered_echo(voices + chatter(), t60_s=0.87), -6.0)


def wet_log():
    """Close sound of water and chopped wood, with a faint answer from the surroundings."""
    wood = log() + crack()
    answer = scattered_echo(np.roll(wood, round(GROUND_ECHO_S * SR)), t60_s=0.3476)
    left, right = (water() + slaps() + panned(bubbles(), -1.5) + panned(wood, -.4)
                   + from_db(-23) * answer)
    return np.array([np.roll(left, shift=4), right])   # the log lies to the right: left hears it later


def scene():
    """The wet log, a brief silence, then the forest."""
    air = forest_air()
    near = wet_log() + from_db(-15) * air
    forest = air + animal_calls() + knocks() + rustles()
    closing = np.clip((SILENCE_S[0] - T) / 0.018, 0, 1) ** 2
    opening = np.clip((T - SILENCE_S[1]) / 0.00093, 0, 1) ** 2
    return near * closing + forest * opening + thump()


def record(dry):
    """The microphone drops the deepest bass; the top is cut."""
    dry = signal.sosfilt(signal.butter(2, LOW_CUT_HZ, "high", fs=SR, output="sos"), dry)
    return signal.sosfilt(signal.cheby2(18, 60, CUTOFF_HZ, fs=SR, output="sos"), dry)


dry = scene()
out = record(dry)
to_wav(out)
```